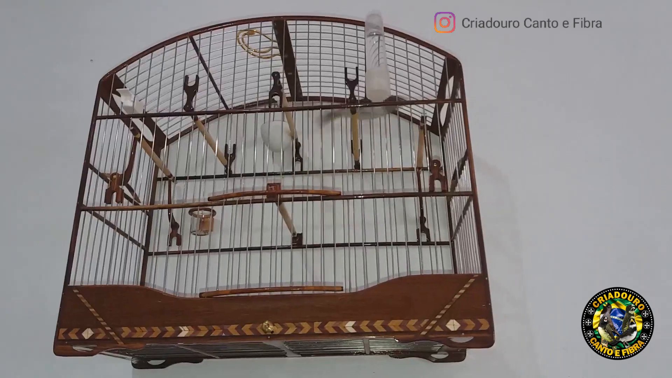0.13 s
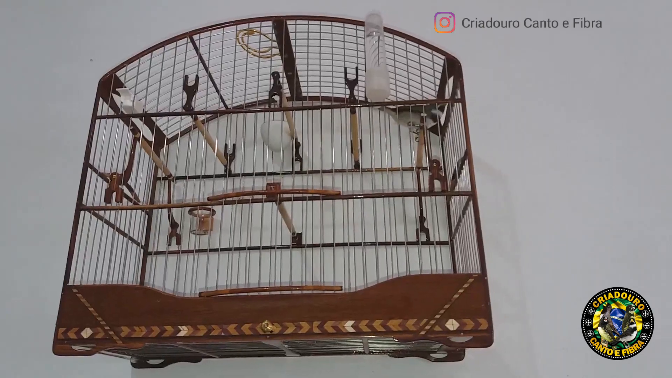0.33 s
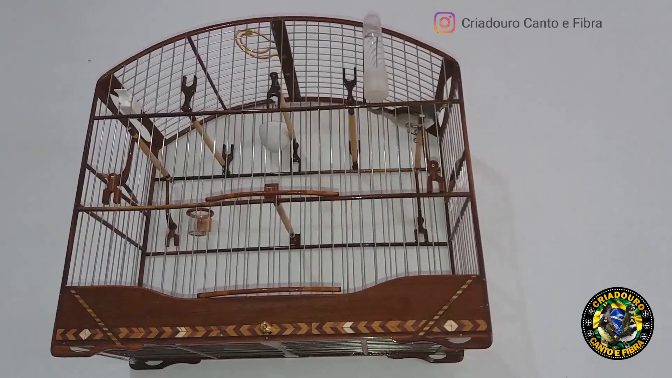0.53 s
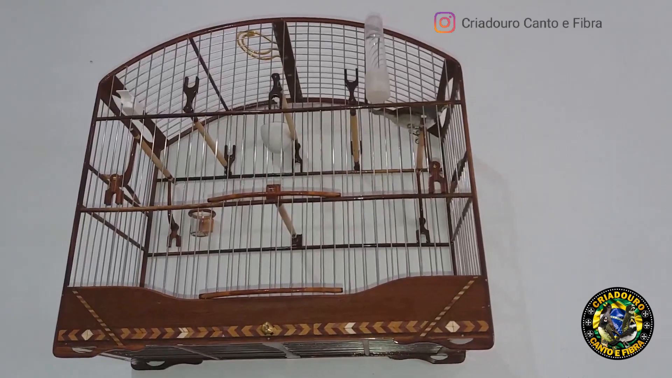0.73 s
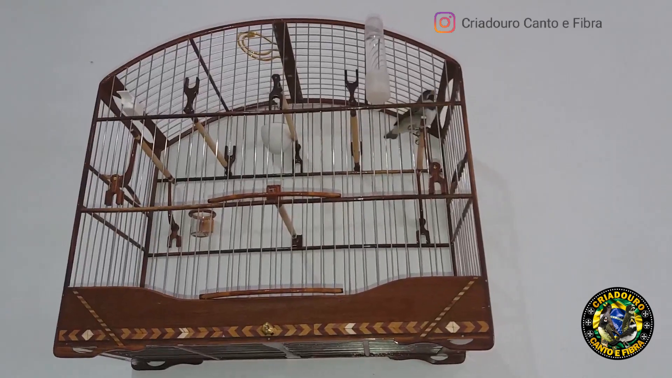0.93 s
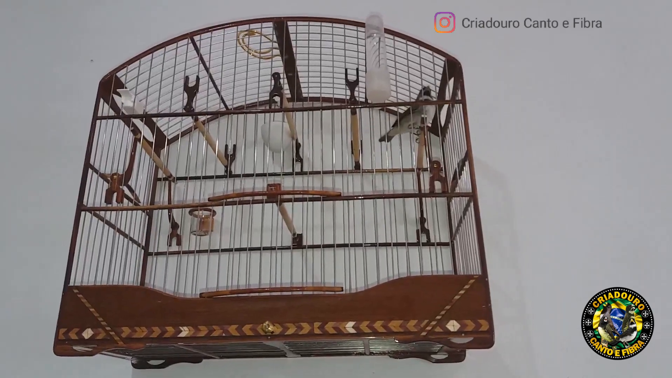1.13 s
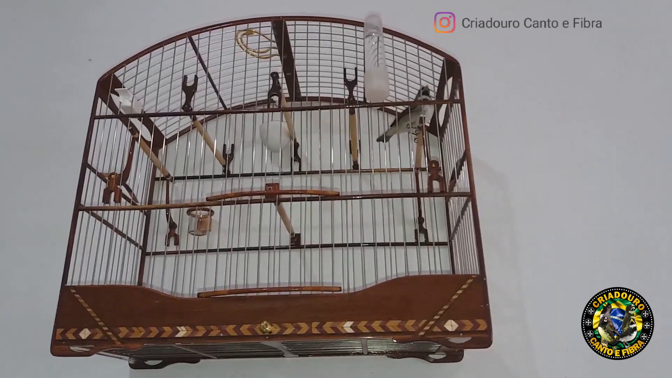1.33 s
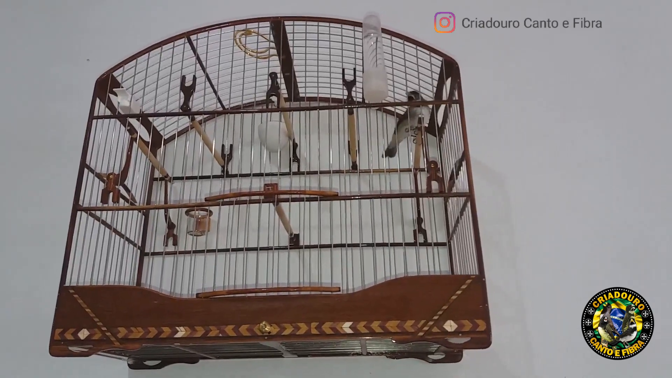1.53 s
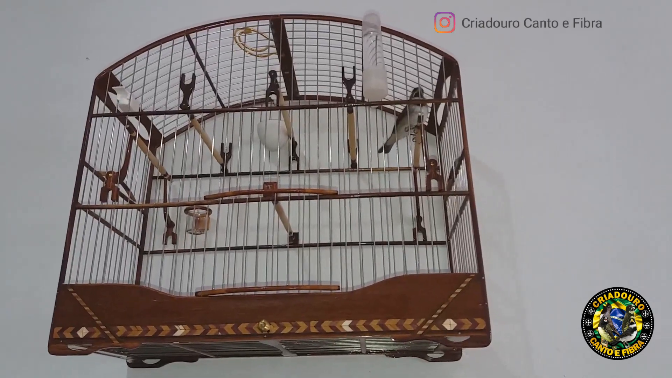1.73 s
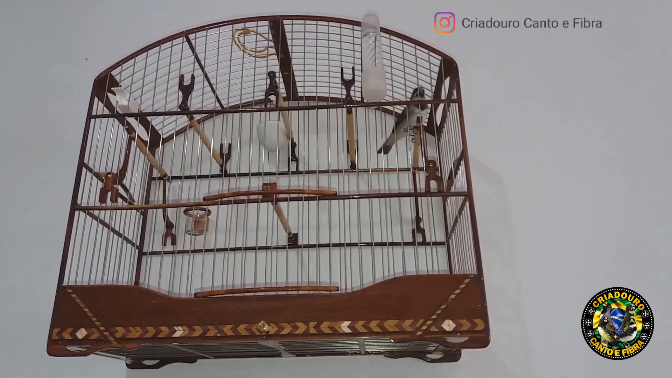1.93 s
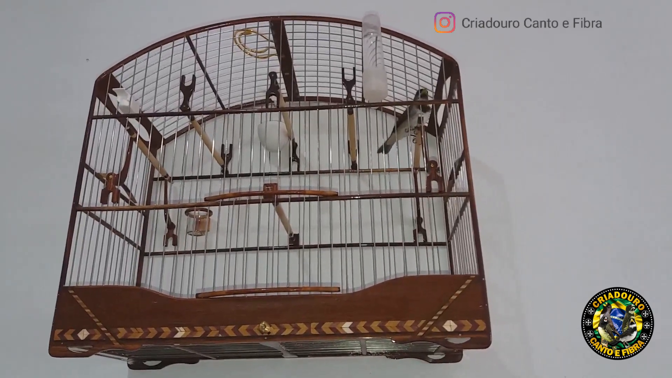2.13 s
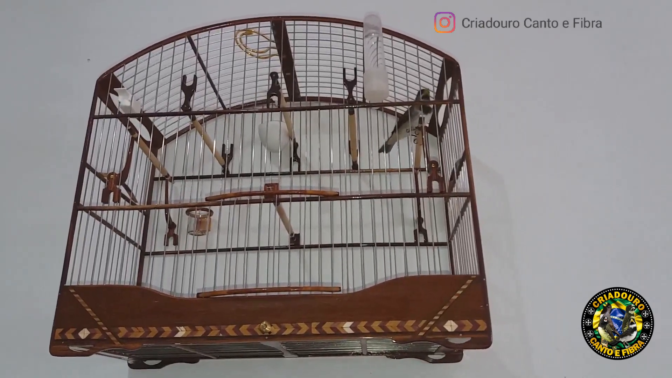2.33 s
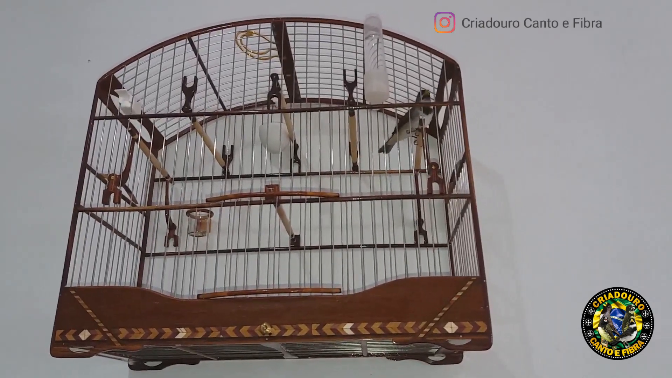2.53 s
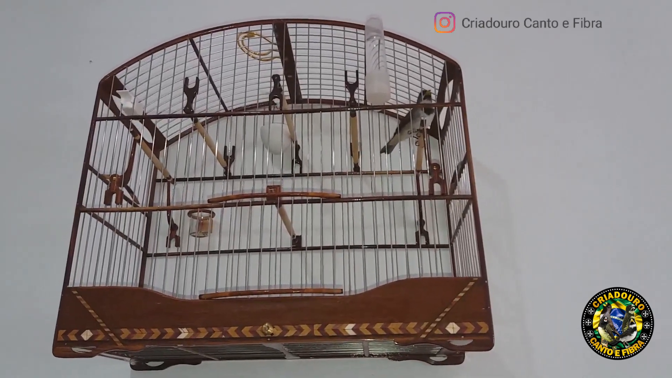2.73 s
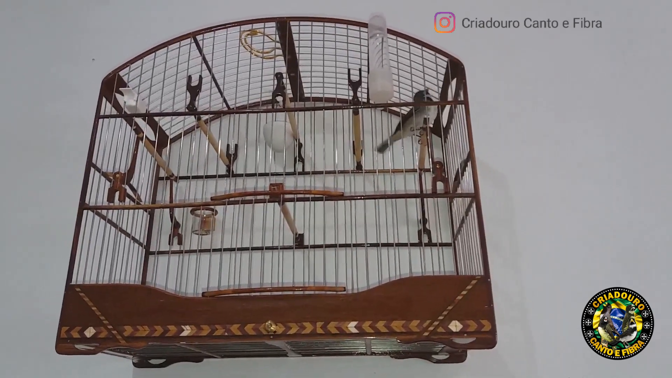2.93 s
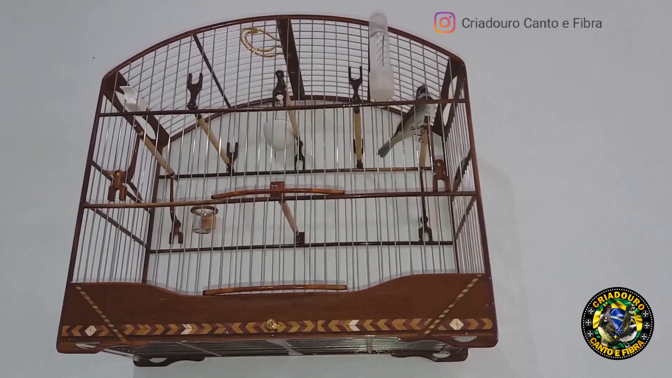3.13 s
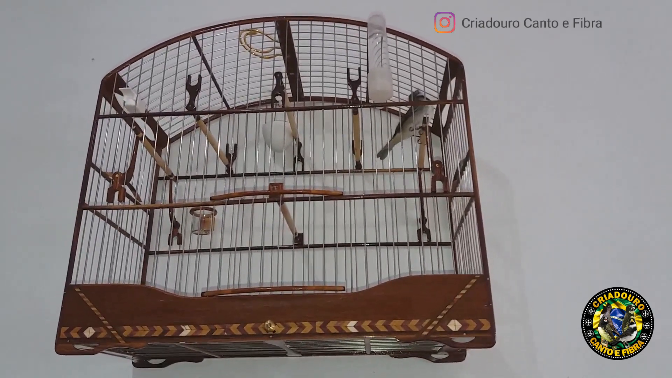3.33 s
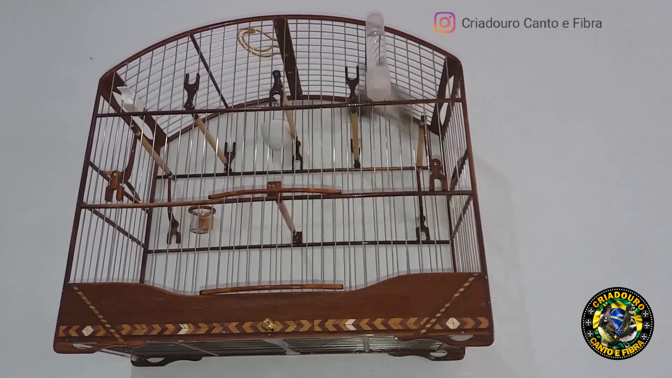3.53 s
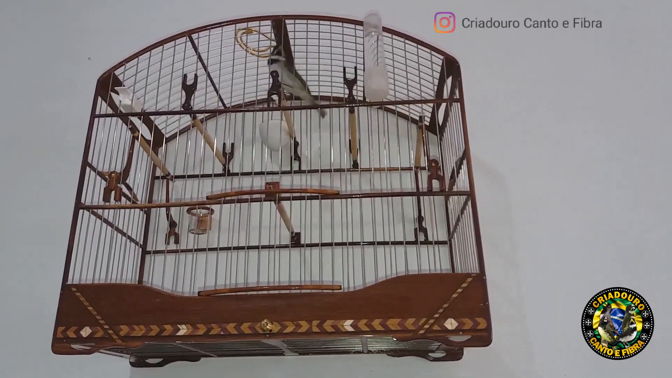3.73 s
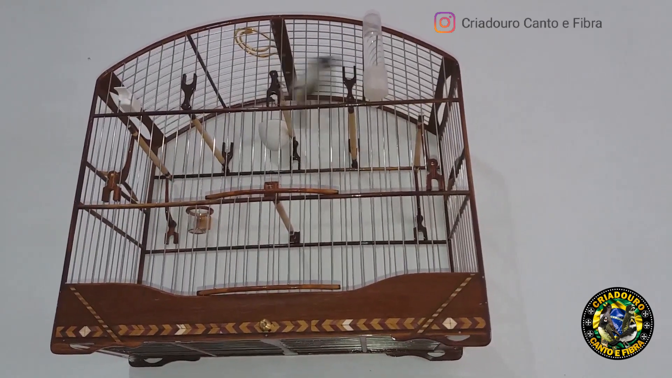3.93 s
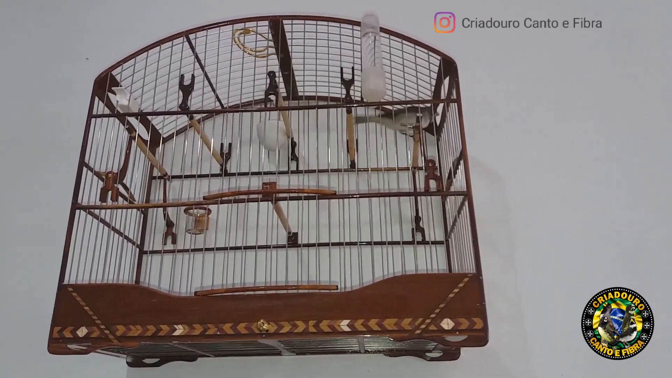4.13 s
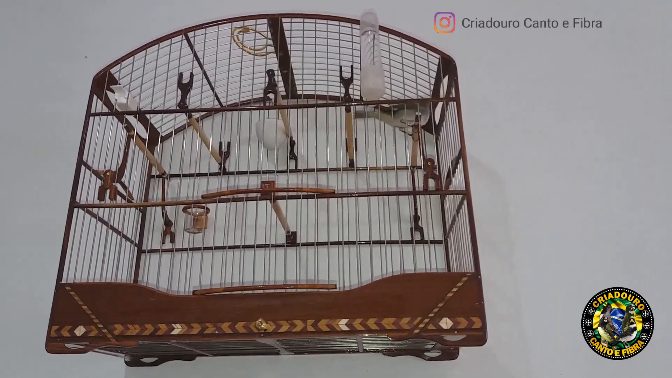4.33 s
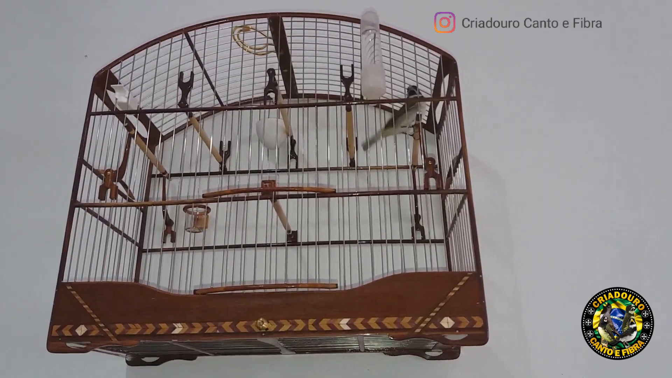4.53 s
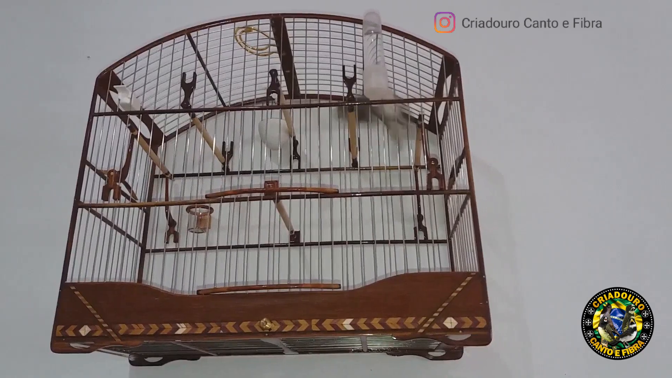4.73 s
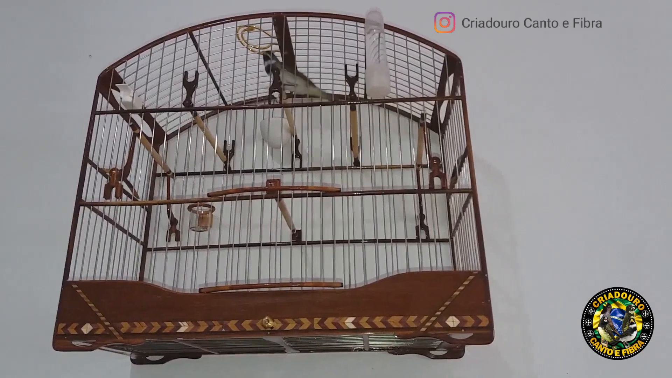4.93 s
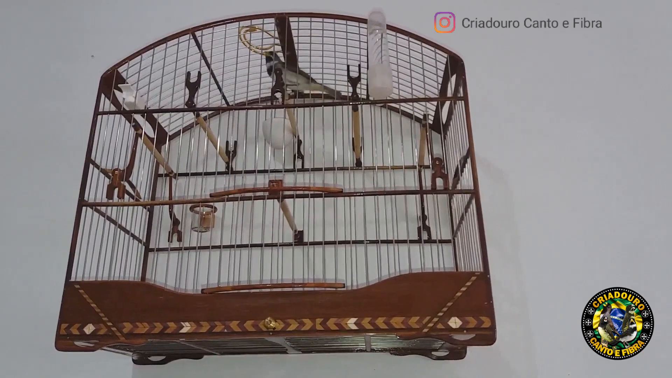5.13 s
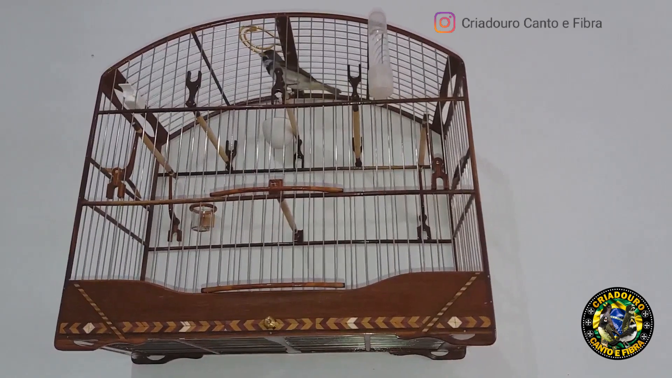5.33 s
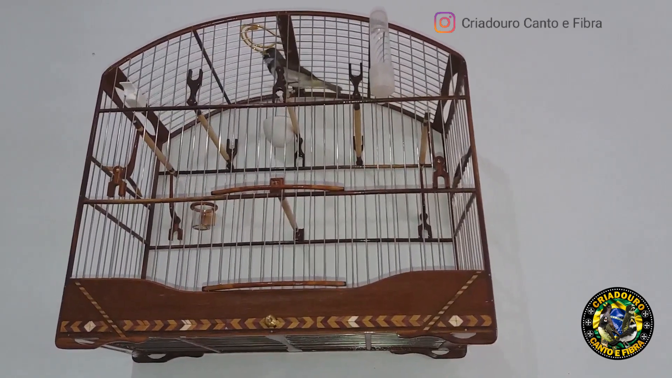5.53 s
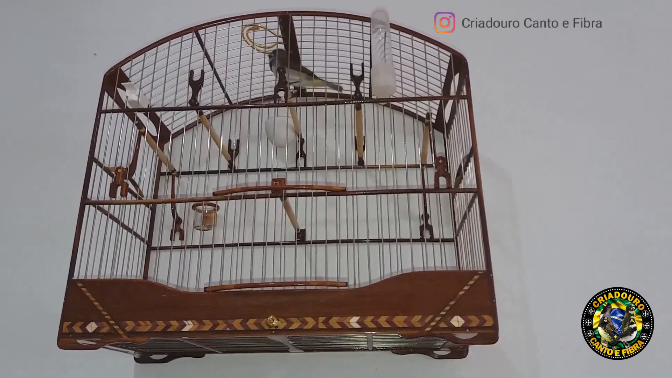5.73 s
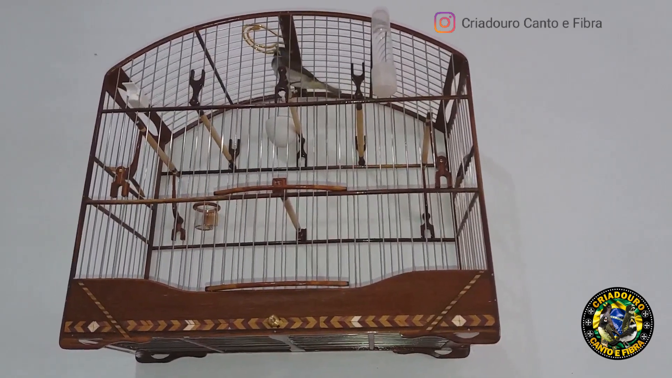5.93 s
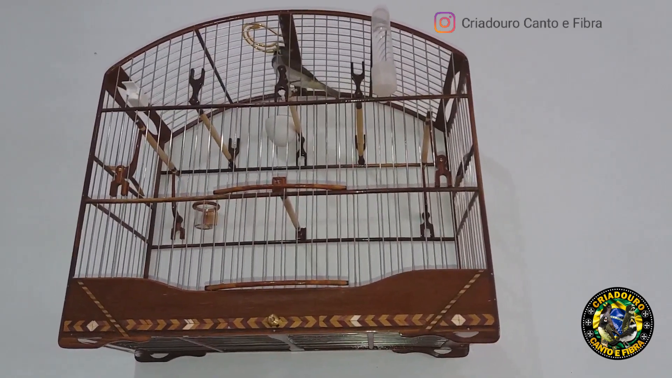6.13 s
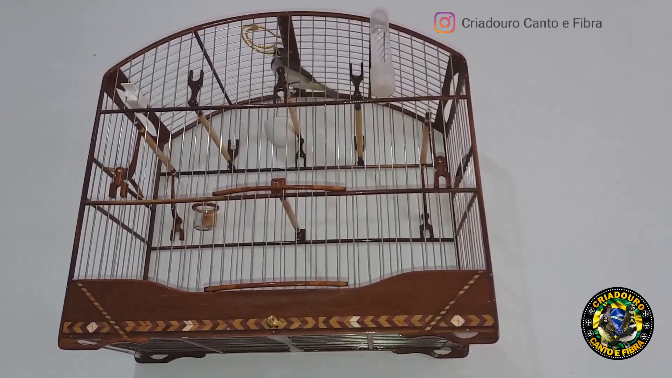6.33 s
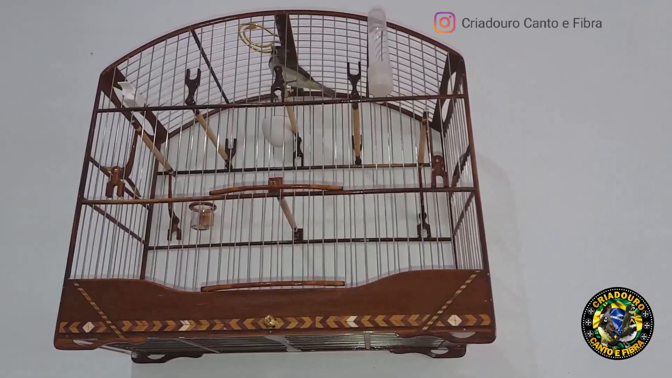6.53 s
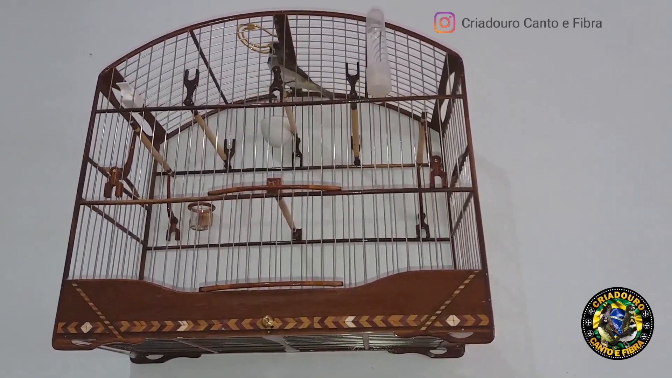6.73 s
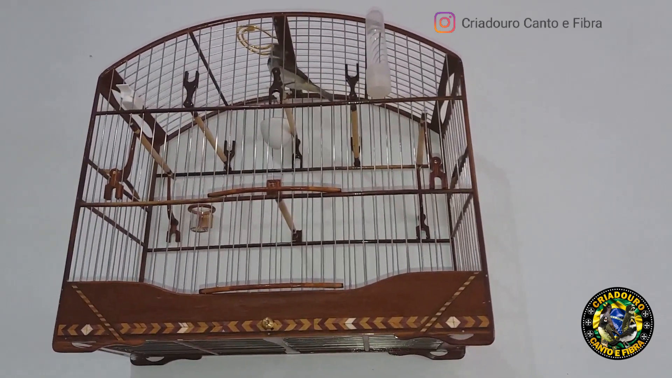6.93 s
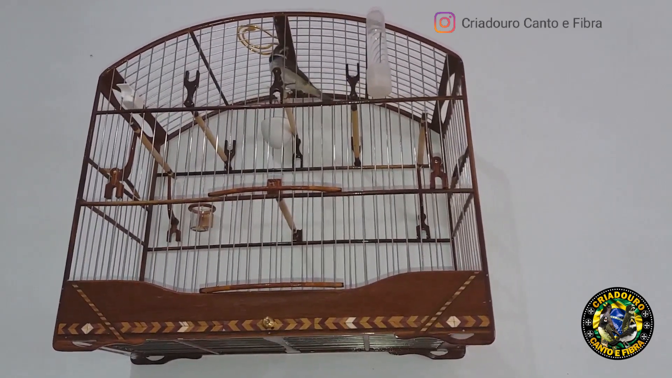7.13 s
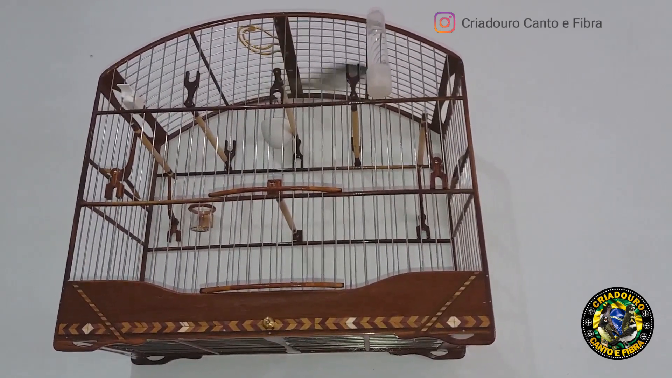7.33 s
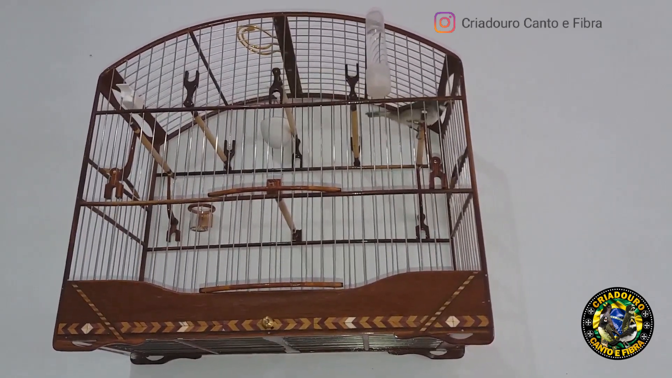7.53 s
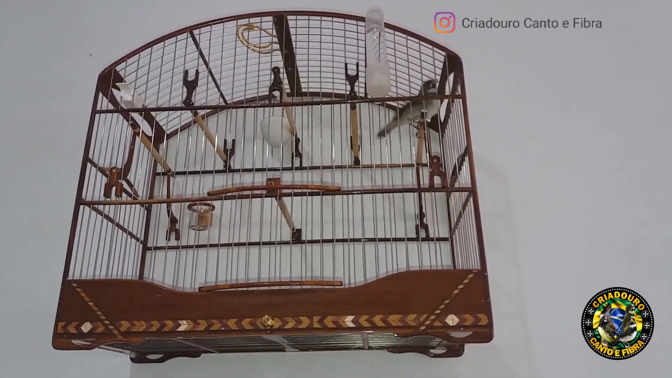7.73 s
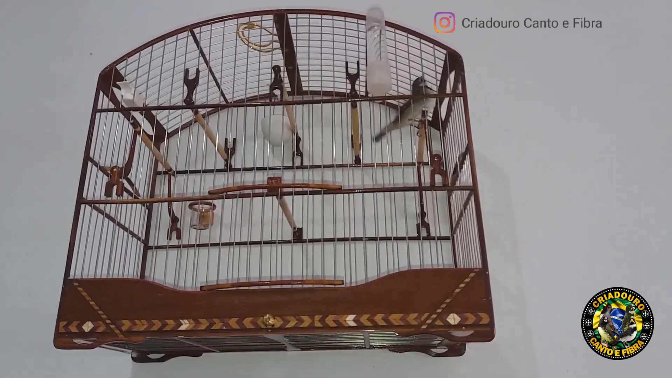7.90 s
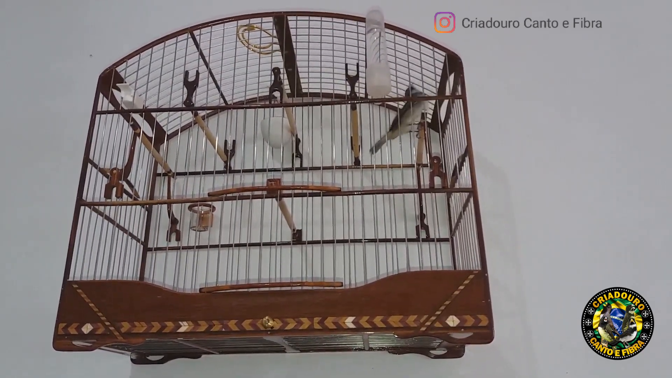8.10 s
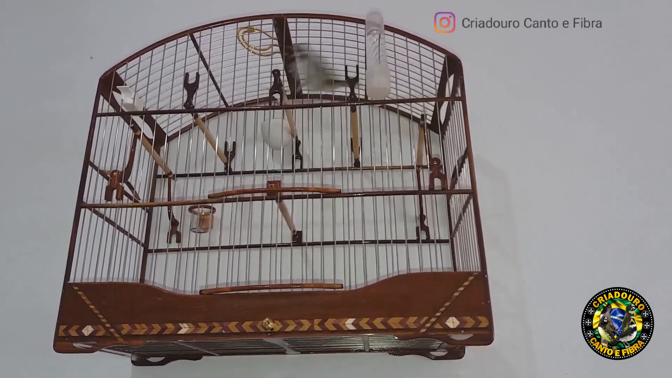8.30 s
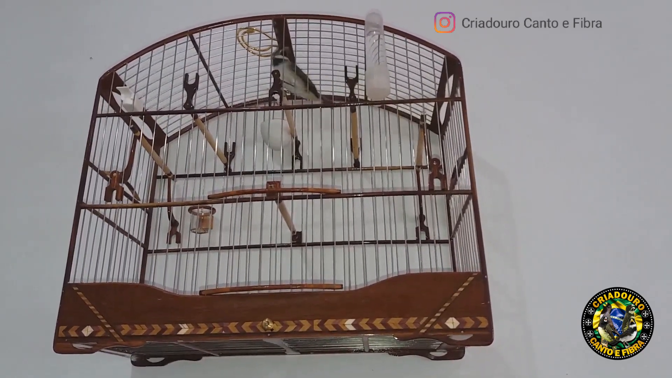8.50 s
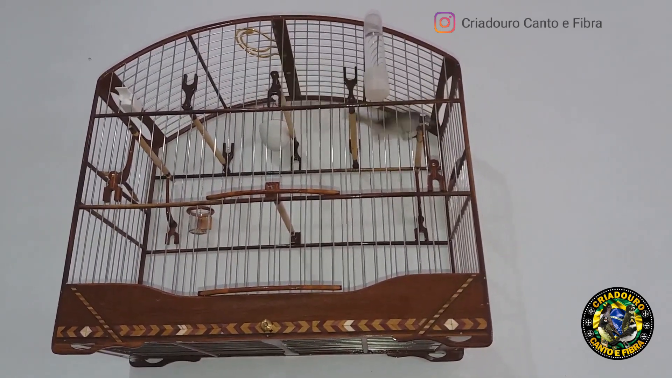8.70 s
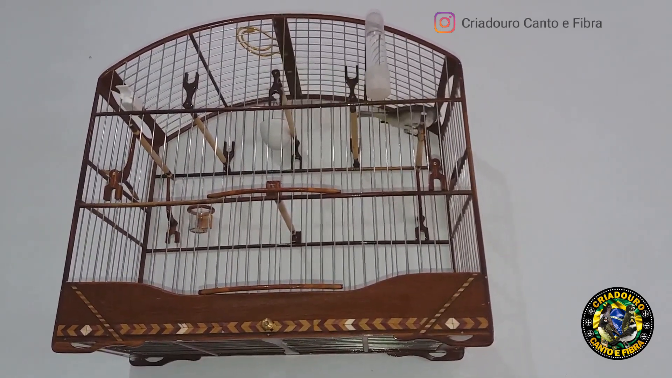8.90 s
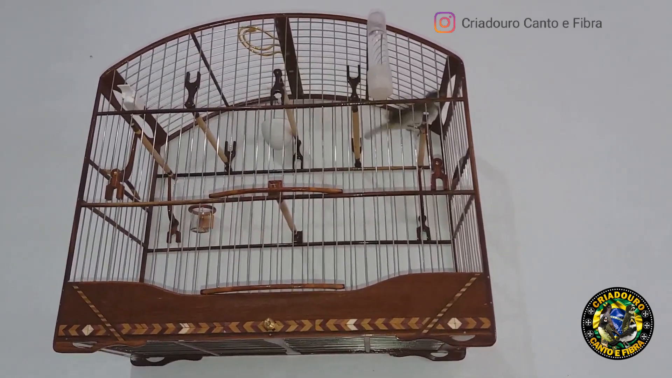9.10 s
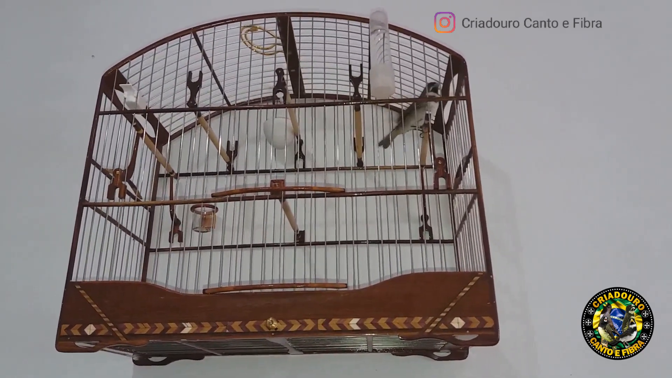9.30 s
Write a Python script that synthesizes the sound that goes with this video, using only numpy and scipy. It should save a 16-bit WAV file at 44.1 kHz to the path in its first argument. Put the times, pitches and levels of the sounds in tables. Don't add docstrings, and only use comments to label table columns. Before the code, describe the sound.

Close, bright birdsong in a bare reverberant room above a soft motor hum and airy hiss. Light ticks of feet on perch and wire come first, then two piercing phrases separated by a few seconds of hopping, each going from clear whistle through buzzy rises to steep descending chirps. The phone microphone overloads slightly on the peaks. Afterwards only ticks, small feather rustles and distant chirps remain.

```python
import sys
import numpy as np
from scipy import signal
from scipy.fft import rfft, irfft
from scipy.io import wavfile
from scipy.ndimage import uniform_filter1d, minimum_filter1d

SR = 44100
rng = np.random.default_rng(int(sys.argv[2]) if len(sys.argv) > 2 else 0)


def how_loud(loudness_db):
    steps = np.asarray(loudness_db, float) / 20
    return 10 ** steps


def transcribe(u):
    v = np.clip(np.atleast_2d(u).T, -1, 1)
    q = np.round(v * 32767).astype(np.int16)
    wavfile.write(sys.argv[1], SR, q)


N = 412776


def curve(table, hz):
    f, value = np.transpose(table)
    return np.interp(np.log(hz + 1), np.log(f), value)


def colour(x, table):
    hz = np.fft.rfftfreq(len(x), 1 / SR)
    return irfft(rfft(x) * how_loud(curve(table, hz)), len(x))


def unit(x):
    return x / np.sqrt(np.mean(x ** 2))


def butter(x, order, hz, kind="low"):
    return signal.sosfilt(signal.butter(order, hz, kind, fs=SR, output="sos"), x)


def hiss(count, lo_hz, hi_hz):
    return unit(butter(rng.standard_normal(count), 2, [lo_hz, hi_hz], "band"))


def ring(x, hz, width_hz):
    return signal.lfilter(*signal.iirpeak(hz, hz / width_hz, fs=SR), x)


def walk(rate):
    k = int(SR / rate)
    steps = np.repeat(rng.standard_normal(N // k + 1), k)
    return unit(uniform_filter1d(uniform_filter1d(steps, k), k)[:N])


def add(track, s, x):
    i = int(s * SR)
    track[i:i + len(x)] += x[:N - i]


# multiple of the pitch, level in dB.
OVERTONES = [(2, -26.5), (3, -29), (4, -34)]


def note(shape, buzz, hz, length, overtone_db, rough, leak):
    warble_hz, slip_radians = 130.64, .5
    noise = hiss(SR // 4, 40, 900)
    air = hiss(SR // 4, 3700, 6000)
    share = np.linspace(0, 1, int(length * SR))
    count = len(share)

    at, *columns = np.transpose(shape)
    ratio, db = (uniform_filter1d(np.interp(share, at, c), size=150, mode="nearest") for c in columns)
    depth_hz = np.interp(share, buzz[:2], buzz[2:])
    warble = np.sin(2 * np.pi * warble_hz * share * length + slip_radians * noise[::-1][:count])
    phase = 2 * np.pi * np.cumsum(hz * ratio + depth_hz * warble) / SR

    overtones = np.zeros(count)
    for k, overtone_level in OVERTONES:
        in_range = k * hz * ratio < .4 * SR
        overtones += how_loud(overtone_level) * np.sin(k * phase) * in_range
    tone = np.sin(phase) + how_loud(overtone_db + 0.014 * depth_hz) * overtones
    tone = tone * (1 + rough * noise[:count]) + leak * depth_hz * air[:count]
    chop = how_loud(np.minimum(.02 * depth_hz, 7) * warble)
    edges = np.clip(np.minimum(share, 1 - share) * length / 0.0013, 0, 1)
    return np.sqrt(2) * tone * how_loud(db) * chop * edges


# share of length from 0 to 1, pitch ratio, level in dB.
WHISTLE = [(0, .82, -32.5), (.14, .92, -15.5), (.4, 0.97, -11.5), (.5, .99, -5), (.72, .99, -2),
           (.95, 0.99, -3.5), (1, 0.98, -23.5)]
RISE = [(0, .68, -39.5), (.08, .7, -22), (.3, 0.7, -15), (.46, .84, -8), (.6, .92, -2.5), (.76, .98, -3.5),
        (.96, 1.003, 1), (1, 1, -14)]
FALL = [(0, 1.06, -26), (.1, 1.035, -9), (.2, 1.005, -1), (.47, .9, -0.5), (.65, .815, -7.5),
        (.83, .772, -4.5), (1, .76, -9)]
FLICK = [(0, .85, -20.5), (.62, .96, -7.5), (.8, .99, -0.5), (1, 1.02, -4.5)]
HELD_FLICK = [(0, .83, -12), (0.449, .965, 0.5), (.7, 1, -4), (1, 1.005, -8.5)]
DROP = [(0, .91, -11), (.18, 0.98, -2.5), (.4, .86, -12.5), (.7, .755, -15.5), (1, .73, -12)]
# start in seconds, level in dB, pitch in Hz, overtone gain in dB.
WHISTLES = [
    (1.733, -11, 4814, -5.5),
    (5.189, -13.5, 4760, -10),
]
# start in seconds, level in dB, pitch in Hz, overtone gain in dB, length in seconds.
RISES = [
    (1.94, -11.5, 4356, -3.5, .148),
    (2.154, -10, 4274, -0.5, .156),
    (5.391, -12.5, 4423, -7, .148),
    (5.623, -10, 4200, -6, .145),
    (5.835, -11, 4263, -4.5, .156),
]
# start in seconds, fall, flick and drop in dB, wait for the flick in seconds.
TUMBLES = [
    (2.359, -9.5, -4.5, -13, .054),
    (2.529, -9.5, -5, -12, 0.059),
    (2.722, -10.5, -6, -10, .053),
]
HELD_TUMBLES = [
    (6.039, -9.5, -11.5, -13.5, .054),
    (6.215, -12, -11.5, -12.5, .047),
]
# start in seconds, length in seconds, level in dB.
PUFFS = [
    (1.702, 0.04, -53),
    (5.153, .035, -56),
    (5.99, .008, -39.5),
]
# frequency in Hz, gain in dB.
BEAK = [(2300, -1), (3000, 3.5), (4300, 4.5), (5100, 5.5), (6500, 5), (7300, -1), (8000, -24), (9200, -2.5),
        (10400, -4), (13000, 7.5), (14500, 1.5), (15500, 6.5)]


def bird():
    out = np.zeros(N)
    # from, to, depth before in Hz, depth after in Hz
    clean, rise_buzz, drop_buzz = (0, 1, 0, 0), (.3, .46, 380, 0), (.32, .6, 0, 90)

    def sing(s, db, *how):
        add(out, s, how_loud(db) * note(*how, rough=.004, leak=.00022))

    for s, db, hz, overtone_db in WHISTLES:
        sing(s, db, WHISTLE, clean, hz, .071, overtone_db)
    for s, db, hz, overtone_db, length in RISES:
        sing(s, db, RISE, rise_buzz, hz, length, overtone_db)

    # tumbles, fall pitch in Hz, flick shape, flick length in seconds
    endings = [(TUMBLES, 7000, FLICK, .021), (HELD_TUMBLES, 6870, HELD_FLICK, .034)]
    for rows, fall_hz, flick, flick_s in endings:
        for s, fall_db, flick_db, drop_db, wait in rows:
            flick_at = s + wait
            drop_at = flick_at + .026
            sing(s, fall_db, FALL, clean, fall_hz, .056, 2.2)
            sing(flick_at, flick_db, flick, clean, 4843, flick_s, -2.5)
            sing(drop_at, drop_db, DROP, drop_buzz, 3836, .052, -3)

    for s, length, db in PUFFS:
        swell = np.hanning(int(length * SR))
        add(out, s, how_loud(db) * swell * hiss(SR // 4, 3200, 7000)[:len(swell)])
    return colour(out, BEAK)


# landing in seconds, peak in dB, wire ring in dB, perch knock in dB.
HOPS = [(0.0494, -53, -9, 4), (0.2982, -58, -7, 3), (3.6247, -64, -10, 0), (3.7324, -60, 8, 4),
        (3.9579, -61.5, -13, 3), (4.0288, -63.5, -2, 2), (4.0476, -52.5, -1, -13), (4.145, -51.5, -5, 5),
        (4.8329, -53, -14.5, 7.5), (4.9393, -51, -6, -7), (7.3013, -52, -17, -3), (7.5043, -50, -16, 8),
        (8.2758, -54.5, -10.5, 2.5), (8.3995, -53.5, -9, 2), (8.6009, -59.5, -4, 7),
        (8.6894, -54.5, -8, 4.5), (8.7922, -50, -10.5, 12.5)]
# frequency in Hz, width in Hz.
WIRE = [(6470, 40), (9000, 500), (2600, 1100), (4930, 900)]


def hops():
    out = np.zeros(N)
    t = np.arange(int(.12 * SR)) / SR
    thin_wire_hz, thin_wire_width = WIRE[0]
    thin_wire = np.sin(2 * np.pi * thin_wire_hz * t) * np.exp(-np.pi * thin_wire_width * t)
    for s, db, wire_db, perch_db in HOPS:
        noise = rng.standard_normal(len(t))
        tick = noise * np.exp(-t / .0025)
        wire = how_loud(wire_db) * 1.4 * thin_wire + 1.5 * ring(tick, *WIRE[1])
        perch = how_loud(perch_db) * (3.1 * ring(tick, *WIRE[2]) + 2.1 * ring(tick, *WIRE[3]))
        rustle = how_loud(-14) * np.diff(noise[::-1], prepend=0) * np.exp(-t / .016)
        claw = .6 * np.diff(tick, prepend=0)
        add(out, s, how_loud(db - 0.5) * (claw + wire + perch + rustle))
    return out


# start in seconds, length in seconds, start pitch in Hz, end pitch in Hz, level in dB.
FAR_CALLS = [
    (7.923, 0.058, 3950, 3600, -65),
    (8.237, 0.056, 3100, 3054, -64),
    (8.304, 0.072, 3900, 3730, -62.5),
    (8.55, .025, 4200, 4120, -63),
    (8.575, .035, 3650, 3480, -61),
    (8.62, 0.033, 3400, 3020, -63),
    (8.721, 0.072, 7200, 4120, -55.5),
]
FAR_BUZZES = [
    (.77, .085, 4197, 3350, -54.5),
    (8.47, 0.074, 6540, 5660, -60.5),
]


def neighbours():
    out = np.zeros(N)
    # call, warble depth in Hz, roughness
    clear = [(row, 0, .15) for row in FAR_CALLS]
    buzzy = [(row, depth_hz, .4) for row, depth_hz in zip(FAR_BUZZES, (500, 200))]
    for (s, length, start_hz, end_hz, db), depth_hz, rough in clear + buzzy:
        ratio = end_hz / start_hz
        glide = [(0, 1, -5), (.3, .7 + .3 * ratio, 0), (1, ratio, -1)]
        buzz = (0, 1, depth_hz, depth_hz)
        add(out, s, how_loud(db) * note(glide, buzz, start_hz, length, -25, rough, leak=0))
    return out


# frequency in Hz, time in seconds.
WALL_T60 = [(2500, 0.65), (4500, 0.57), (7000, 0.61), (10000, .55), (15000, 0.48)]


def walls():
    hz, t, cells = signal.stft(rng.standard_normal(int(1.3 * SR)), SR, nperseg=256)
    decay = how_loud(-60 * t / curve(WALL_T60, hz)[:, None])
    tail = signal.istft(cells * decay, SR, nperseg=256)[1]
    tail *= np.clip(np.arange(len(tail)) / SR / .024, 0, 1)
    return tail / np.sqrt(np.sum(tail ** 2))


# frequency in Hz, density in dB per Hz.
AIR = [(30, -48.5), (94, -3), (144, -12.5), (282, -16.5), (411, -9), (829, -17.5), (2400, -24),
       (3020, -36.5), (4280, -32.5), (5600, -42), (7400, -44.5), (8100, -62), (11500, -50), (15600, -51)]
# frequency in Hz, width in Hz, level in dB.
MOTOR = [(103.2, 15, -45), (225.2, 10, -50), (320.2, 7.4, -55.5), (406.2, 11, -46), (504.3, 14, -49),
         (662, 10, -60), (826.5, 27, -54.5), (980, 11, -63), (1154, 10, -61.5), (1702, 14, -62.5),
         (3400, 90, -71.5), (4300, 84, -69.5)]


def background():
    air = colour(rng.standard_normal(N), AIR)
    low = butter(air, 2, 700)
    air = low * how_loud(1.2 * walk(6)) + (air - low) * how_loud(0.54 * walk(3))
    lines = np.zeros(N)
    for hz, width, db in MOTOR:
        lines += how_loud(db + 0.5 * walk(2.5)) * unit(ring(rng.standard_normal(N), hz, width))
    return how_loud(-43) * unit(air) + lines


# delay in seconds, level in dB.
ECHOES = [(.0029, -9), (.009, -16), (.016, -8), (.022, -10)]


def scene():
    near, far = bird() + hops(), neighbours()
    direct = near + how_loud(-3.0) * far
    early = sum(how_loud(db) * np.roll(direct, int(delay * SR)) for delay, db in ECHOES)
    tail = signal.fftconvolve(how_loud(-2.5) * near + how_loud(5.0) * far, walls())[:N]
    return (direct + early + tail + background())[None]


# start, deepest point and release in seconds, depth in dB.
DUCKS = [
    (1.8, 2.9, 3.9, -6.5),
    (5.3, 5.901, 6.15, -2.5),
    (6.624, 6.838, 7.15, -3.5),
]


def ducking():
    t = np.arange(N) / SR
    gain_db = np.zeros(N)
    for start, deepest, lets_go, db in DUCKS:
        step = np.interp(t, [start, deepest], [0, db])
        gain_db += step * np.exp(-np.maximum(t - lets_go, 0) / .3)
    return gain_db


# time in seconds, peak in dB.
OVERLOADS = [(2.378, -29.5), (2.385, -30), (2.427, -27.5), (2.557, -30), (2.577, -36), (2.599, -41.5),
             (2.74, -37), (2.752, -38), (2.761, -37.5), (2.791, -34.5), (6.059, -26.5), (6.068, -34),
             (6.229, -32.5)]


def overloads():
    low, high = np.zeros(N), np.zeros(N)
    t = np.arange(int(.03 * SR)) / SR
    sag = 0.2 * np.sin(2 * np.pi * 58 * t) * np.exp(-t / 0.019)
    thump = np.sin(2 * np.pi * 450 * t) * np.exp(-t / 0.0007)
    for s, db in OVERLOADS:
        noise = rng.standard_normal(len(t))
        knock = thump + 0.66 * noise * np.exp(-t / 0.0027)
        add(low, s, how_loud(db + 13.5) * (knock - sag))
        add(high, s, how_loud(db - 11) * noise[::-1] * np.exp(-t / .003))
    return butter(low, 2, 2500) + butter(high, 4, 8300, "high")


def top_cut(x):
    return signal.sosfilt(signal.butter(12, 15750, fs=SR, output="sos"), x)


def record(dry):
    x = dry * how_loud(ducking())
    sums = butter(x ** 2, 7, 9000, "high")
    x = x + how_loud(-23) * sums - how_loud(-38) * x ** 3
    room_left = np.minimum(1, .96 / (np.abs(x) + 1e-9))
    x = x * uniform_filter1d(minimum_filter1d(room_left, size=400), size=400)
    x = butter(x + overloads(), 3, 46, "high")
    return top_cut(x)


dry = scene()
out = record(dry)
transcribe(out)
```